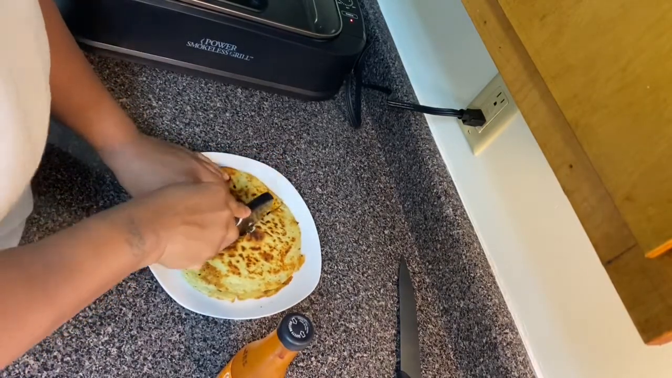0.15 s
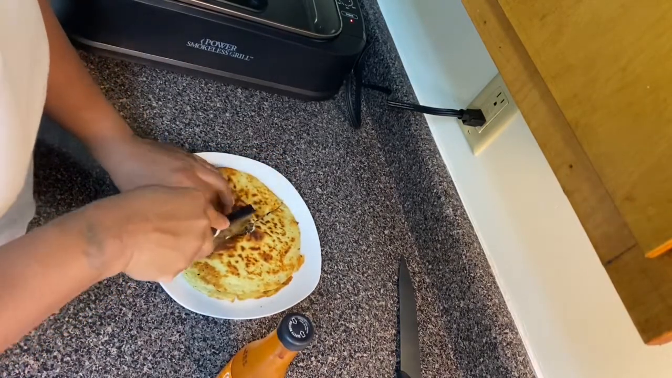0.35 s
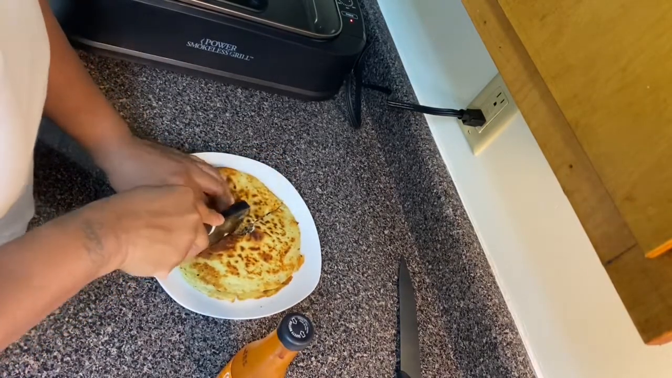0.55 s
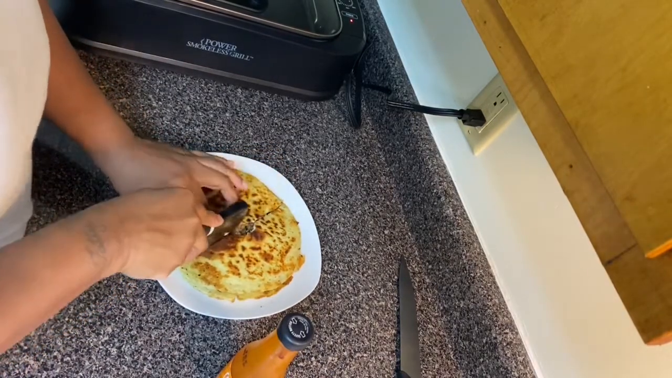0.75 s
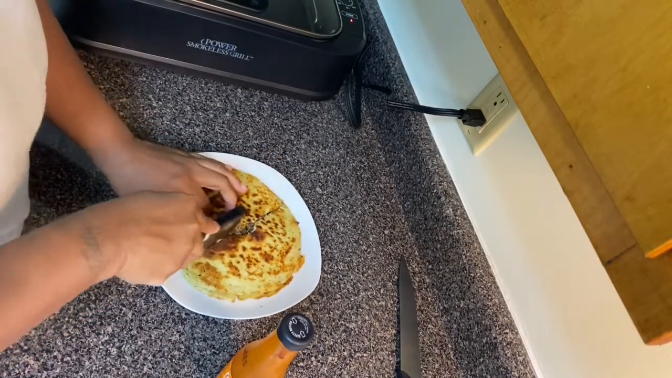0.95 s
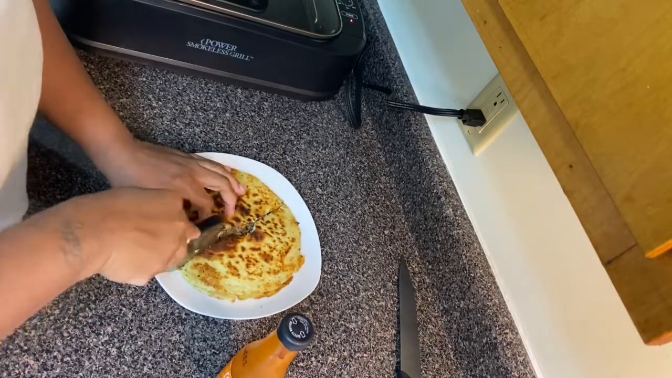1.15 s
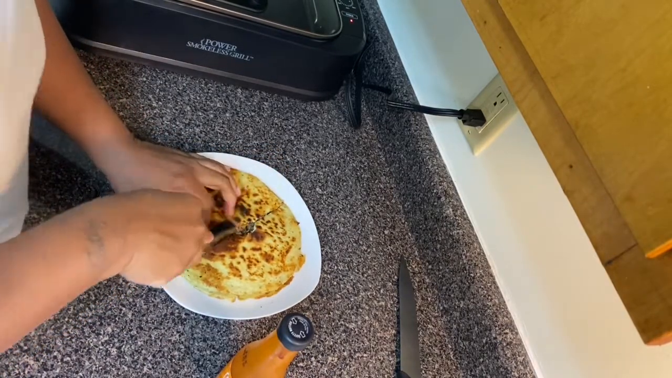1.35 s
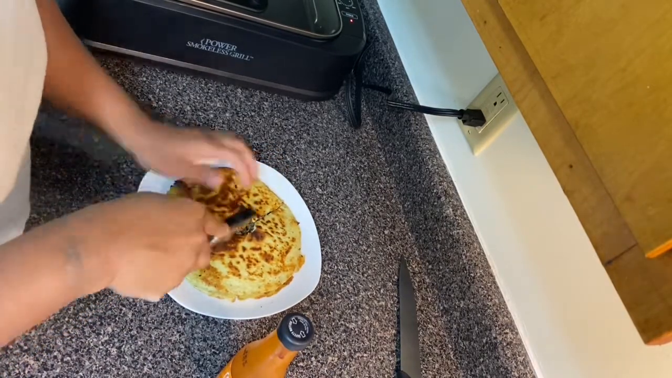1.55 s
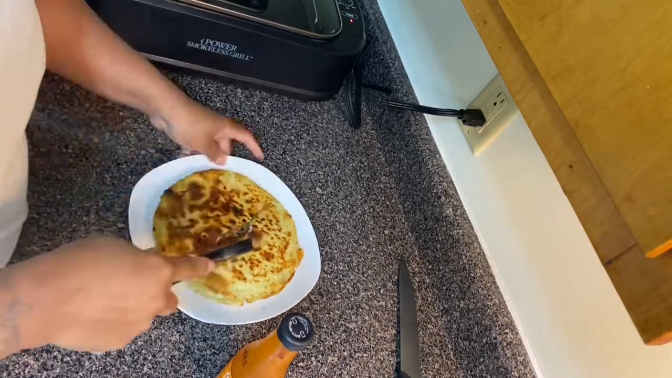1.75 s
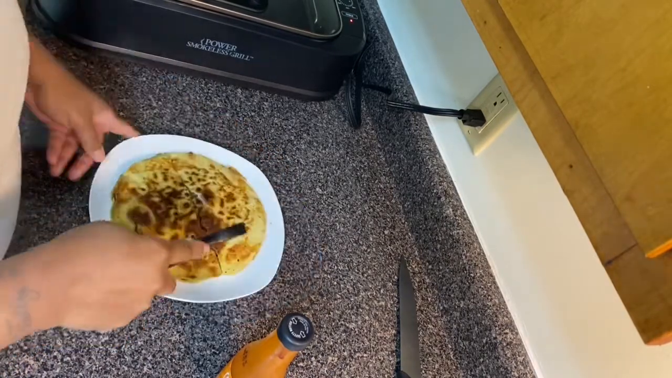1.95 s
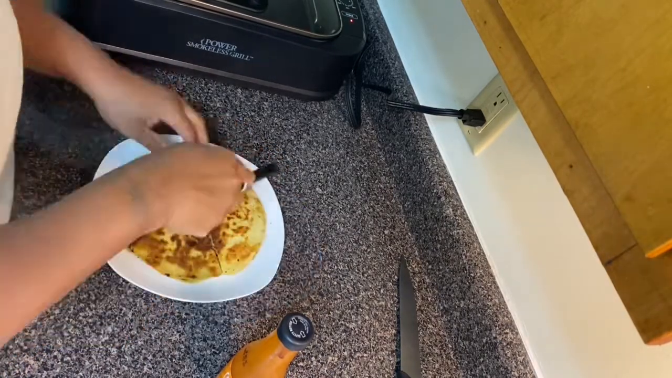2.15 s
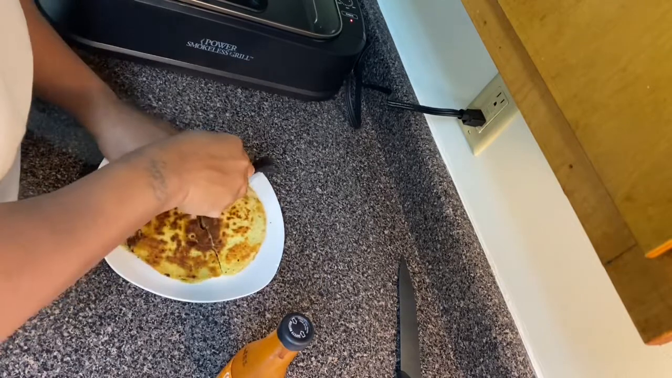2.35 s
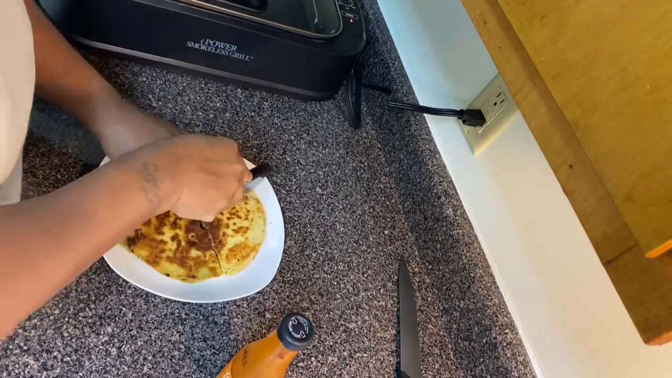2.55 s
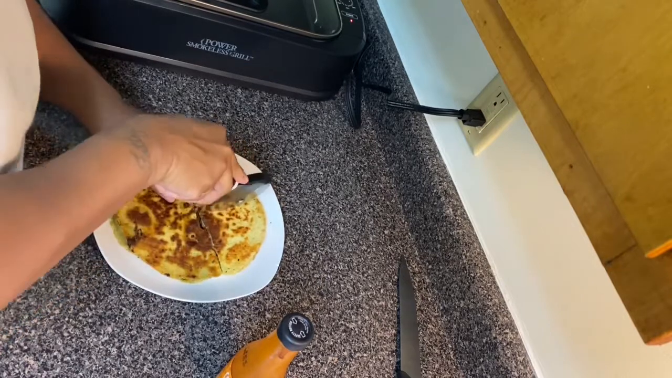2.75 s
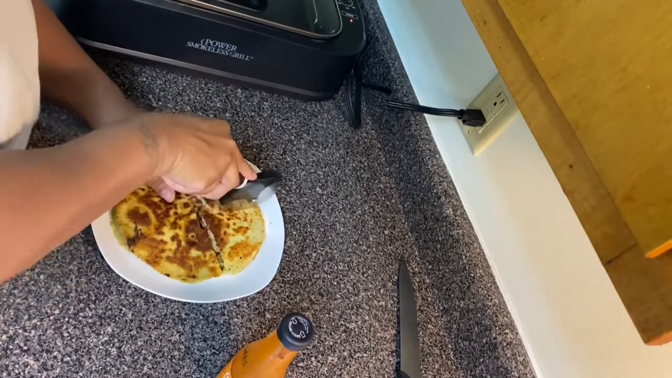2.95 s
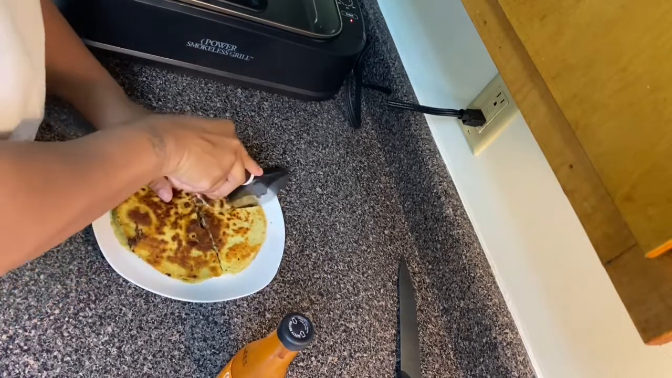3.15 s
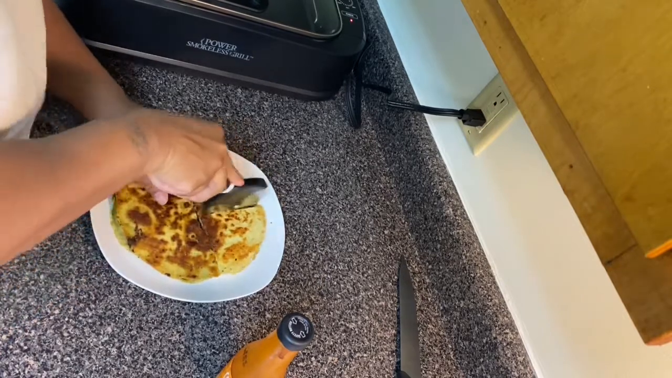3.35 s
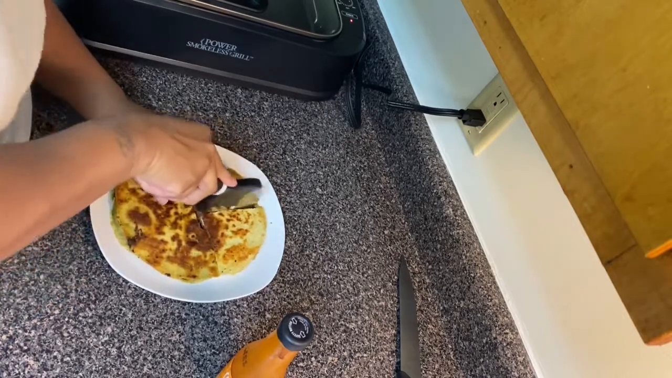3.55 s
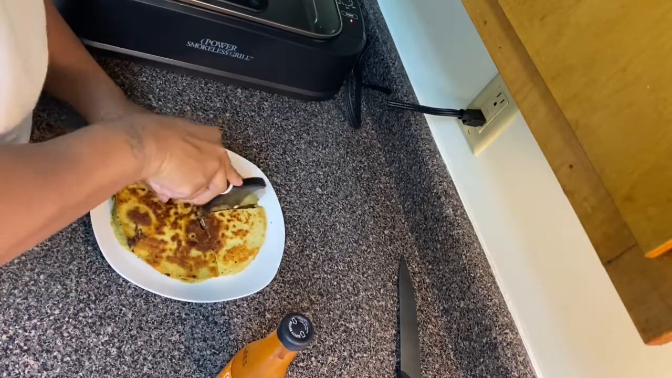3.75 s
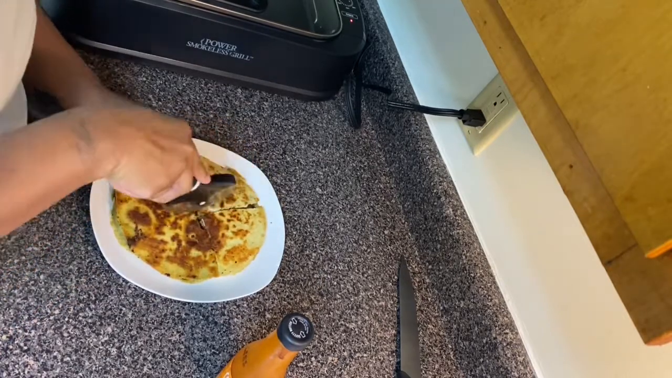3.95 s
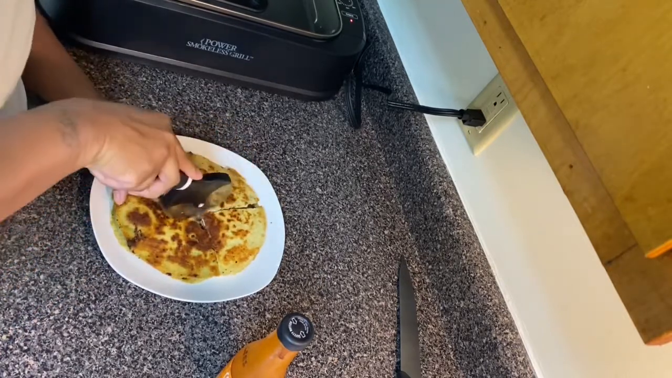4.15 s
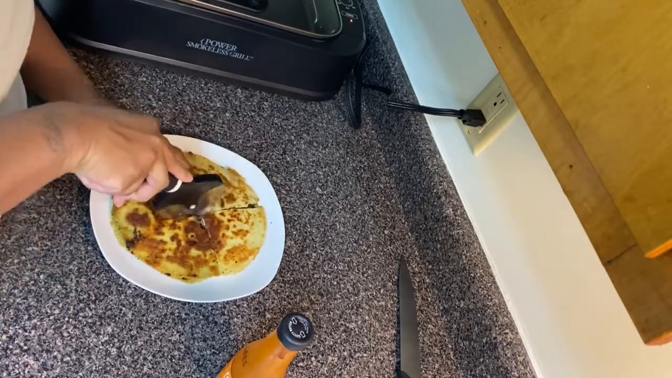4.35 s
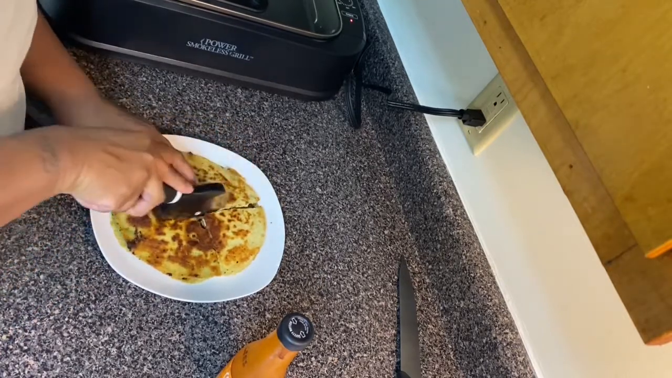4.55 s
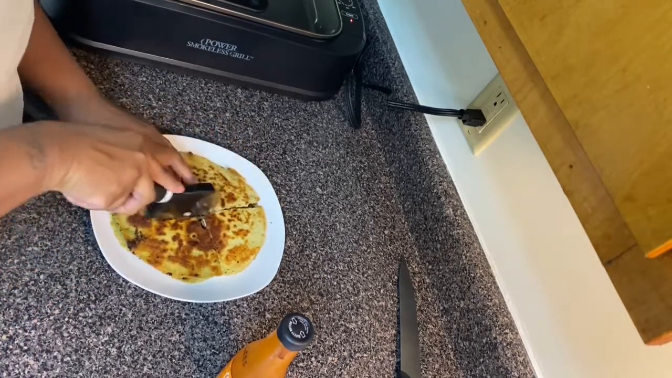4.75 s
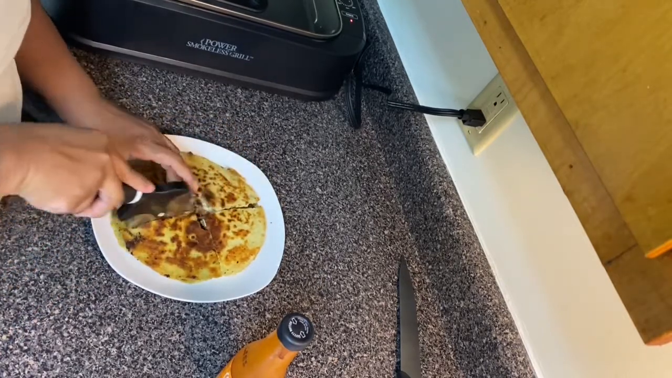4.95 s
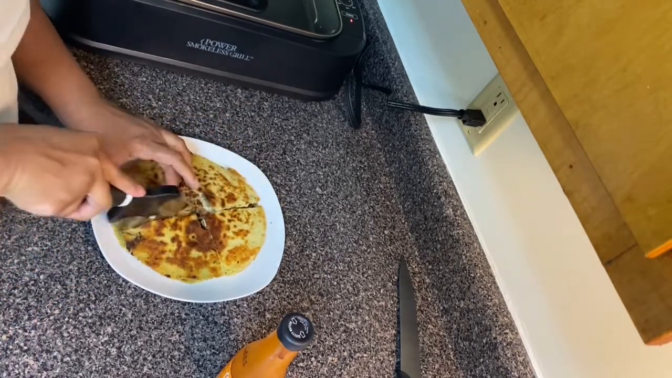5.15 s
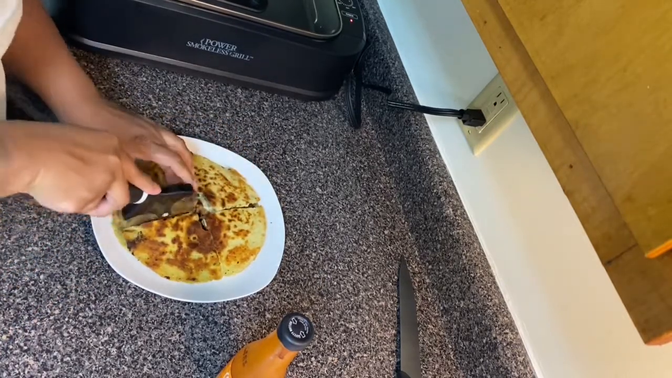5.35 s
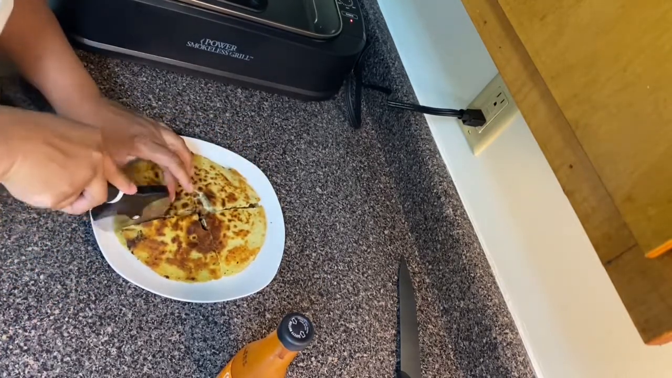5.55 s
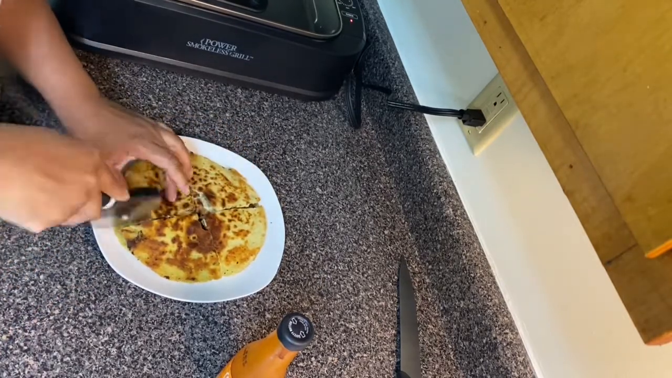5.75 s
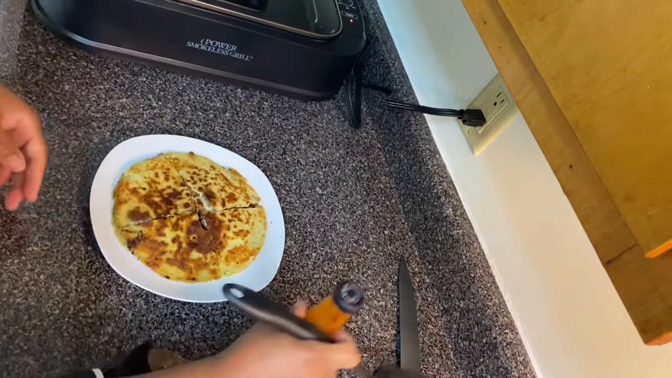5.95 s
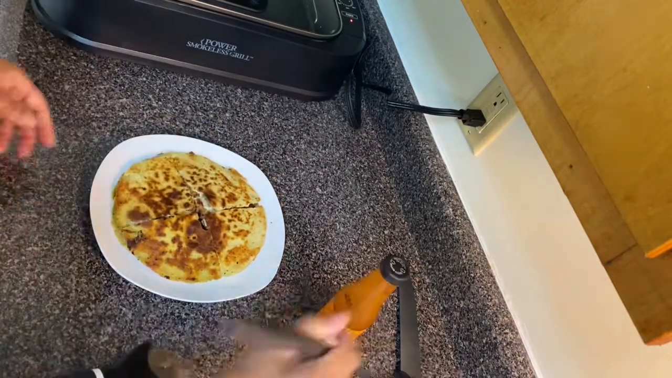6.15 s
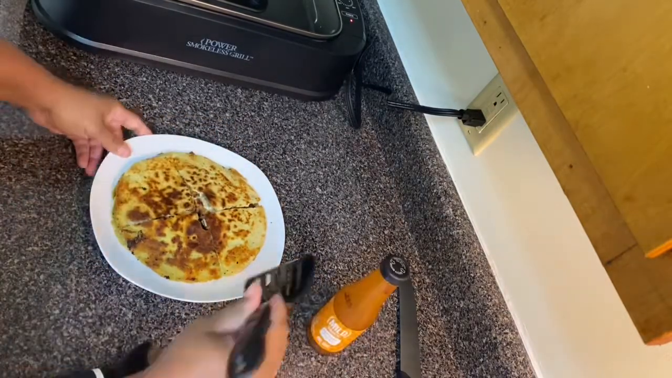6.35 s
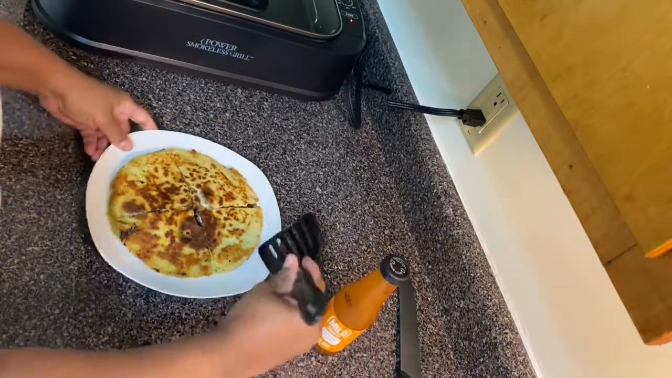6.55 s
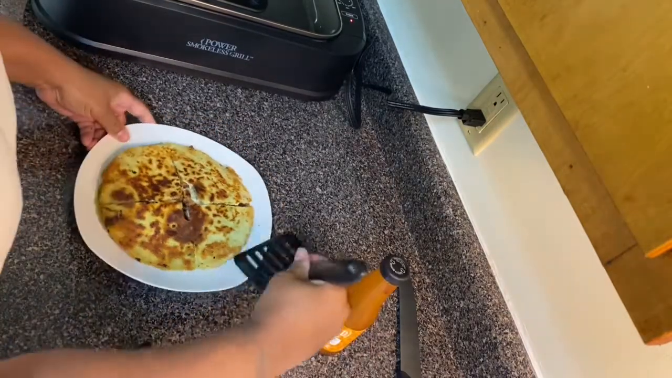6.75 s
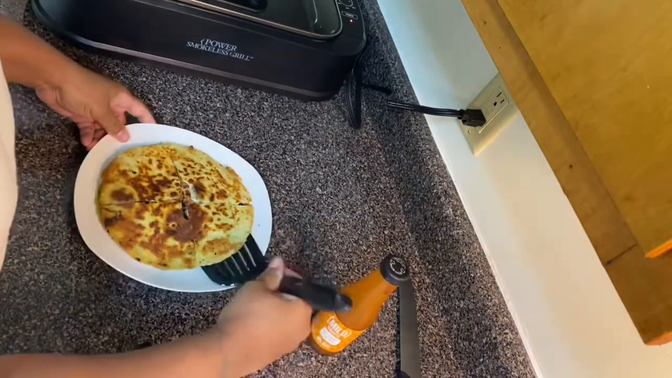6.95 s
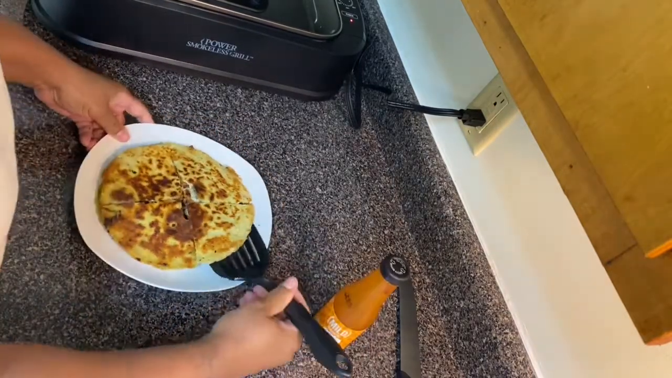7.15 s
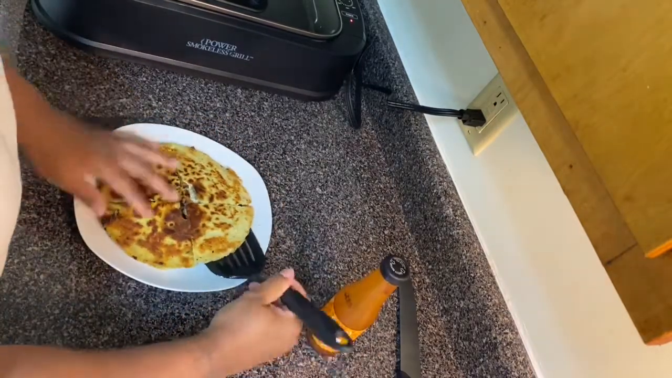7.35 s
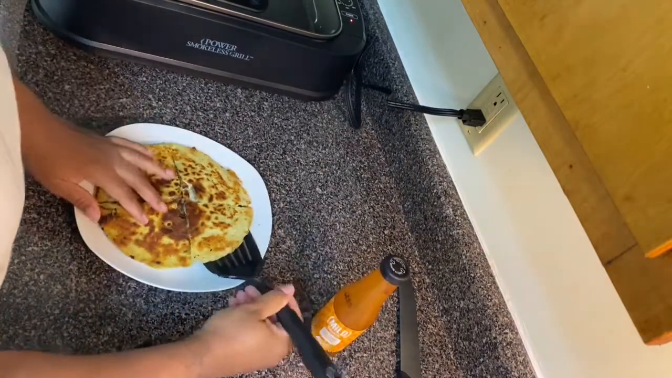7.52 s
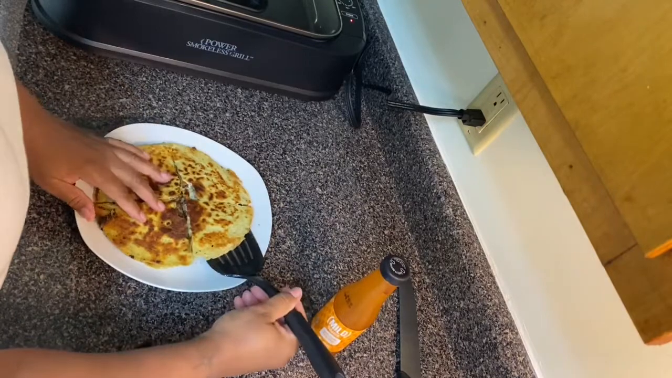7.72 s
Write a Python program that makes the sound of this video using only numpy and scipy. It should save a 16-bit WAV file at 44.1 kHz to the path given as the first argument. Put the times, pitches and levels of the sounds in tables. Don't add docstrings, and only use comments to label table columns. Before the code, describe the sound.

Close, brittle crunches and ticks as a cutting wheel works through a crisp wrap on a ceramic plate, with knocks, a plate scrape and humming kitchen.

```python
import sys
import numpy as np
from scipy import signal
from scipy.fft import rfft, irfft, next_fast_len
from scipy.io import wavfile
from scipy.ndimage import uniform_filter1d

SR = 44100
rng = np.random.default_rng(int(sys.argv[2]) if len(sys.argv) > 2 else 0)


def waveform_to_disk(signal):
    frames = np.transpose(np.atleast_2d(signal))
    scaled = np.clip(frames, -1, 1) * 32767
    samples = np.round(scaled).astype(np.int16)
    wavfile.write(sys.argv[1], SR, samples)


def gain_from_db(level_db):
    decades = np.asarray(level_db, float) / 20
    return 10 ** decades


N = 343142
CHANGE_S = 5.966

# f/Hz, likeness/0..1
PORT_LIKENESS = [(60, 0.98), (250, 0.9), (450, 0.78), (800, 0.16), (1500, 0.064), (3000, 0.38),
                 (6000, 0.59), (12000, 0.77)]
# f/Hz, left-right level/dB
PORT_LEAN = [(110, -1), (200, 1.5), (380, -1), (700, -1.5), (1290, 2.5), (2380, 1), (4400, 1.5), (10000, 5)]


def rms_one(x):
    return x / np.sqrt(np.mean(x ** 2) + 1e-20)


def in_time(spans):
    rows = []
    for span in spans:
        quiet = [-100] * (len(span[0]) - 1)
        rows += [(span[0][0] - .004, *quiet), *span, (span[-1][0] + .004, *quiet)]
    s, *columns = np.transpose(rows)
    return [gain_from_db(np.interp(np.arange(N) / SR, s, c)) for c in columns]


def at_hz(points, hz):
    f, value = np.array(points)[:, :2].T
    return np.interp(np.log(hz), np.log(f), value)


def band(x, low_hz, high_hz):
    edges = [low_hz, min(high_hz, .45 * SR)]
    return signal.sosfilt(signal.butter(2, edges, "band", fs=SR, output="sos"), x)


def pan(x, db):
    return np.outer(gain_from_db([db / 2, -db / 2]), x)


def add(out, s, sound):
    at = round(s * SR)
    out[..., at:at + sound.shape[-1]] += sound[..., :N - at]


def ring(clicks, hz, t60):
    r = gain_from_db(-60 / (max(t60, .002) * SR))
    w = 2 * np.pi * hz / SR
    return signal.lfilter([0, np.sin(w)], [1, -2 * r * np.cos(w), r * r], clicks + 1e-18)


def strike(events, modes, scatter_db):
    at = [round(s * SR) for s, db in events]
    luck = rng.standard_normal((len(events), len(modes)))
    out = 0
    for k, (hz, level_db, t60) in enumerate(modes):
        clicks = np.zeros(N)
        hit_db = np.array(events)[:, 1] + level_db + scatter_db * luck[:, k]
        clicks[at] = gain_from_db(hit_db) * np.sign(luck[:, k - 1])
        out = out + ring(np.roll(clicks, shift=9 * k), hz, t60)
    return out


def resonate(x, peaks):
    out = 0
    for k, (hz, width, level_db) in enumerate(peaks):
        r = np.exp(-np.pi * max(width, 1) / SR)
        poles = [1, -2 * r * np.cos(2 * np.pi * hz / SR), r * r]
        out = out + (-1) ** k * gain_from_db(level_db) * (1 - r * r) * signal.lfilter([1, 0, -1], poles, x)
    return rms_one(out)


def blotchy(x, peaks, patchy_db):
    steps = np.arange(0, N + 900, 900)
    luck_db = patchy_db * rng.standard_normal((len(peaks), len(steps)))
    out = 0
    for peak, luck in zip(peaks, luck_db):
        out = out + gain_from_db(peak[2] + np.interp(np.arange(N), steps, luck)) * resonate(x, [peak])
    return rms_one(out)


def grains(per_s, spread_db):
    sizes = gain_from_db(spread_db * np.minimum(rng.exponential(1, N), 4)) * rng.choice([-1, 1], N)
    return rms_one(sizes * (rng.random(N) < per_s / SR))


def crumble(t, length_s):
    fall = np.exp(-t / np.clip(length_s, .001, .03)) + 0.33 * np.exp(-t / 0.012)
    return np.minimum(t / 0.00012, 1) * fall


def sing(hz, width, size):
    wander = np.sqrt(2 * np.pi * max(width, 1) / SR) * rng.standard_normal(size)
    return np.sqrt(2) * np.sin(np.cumsum(2 * np.pi * hz / SR + wander))


def crust():
    # start t/s, length/s, level/dB
    snaps = [(0.722, .046, -61), (0.791, 0.056, -55), (.86, 0.048, -60), (1.102, 0.039, -56),
             (1.204, 0.067, -55), (1.283, 0.071, -54), (1.37, 0.069, -57.5), (1.435, .03, -59),
             (2.426, 0.039, -53), (2.664, 0.014, -55), (3.119, 0.11, -52), (3.694, 0.036, -56),
             (4.284, 0.047, -56), (4.374, 0.054, -58), (4.447, 0.11, -56.5), (4.537, 0.036, -57),
             (4.598, 0.18, -56), (5.611, 0.03, -55)]
    flakes = [(0.0, 0.043, -47.5), (.18, 0.1, -59), (.406, .04, -55.5), (.498, 0.041, -51),
              (.632, 0.069, -53.5), (2.54, 0.025, -64), (2.922, 0.11, -51.5), (3.052, 0.035, -53),
              (3.3, 0.15, -57.5), (4.173, 0.049, -61), (4.756, 0.14, -54.5), (4.92, 0.068, -53),
              (5.053, 0.051, -52.5), (5.166, 0.099, -54.5), (5.458, .03, -54), (6.668, .03, -54),
              (6.772, 0.039, -45.5), (6.843, 0.23, -60), (6.998, 0.06, -59), (7.11, 0.045, -57.5)]
    squashes = [(.06, 0.067, -59), (1.15, 0.035, -53.5), (3.108, 0.046, -51), (3.42, 0.032, -53),
                (3.482, 0.042, -53.5), (3.539, 0.029, -50.5), (3.6, 0.055, -54), (4.678, 0.091, -62),
                (5.107, 0.032, -54.5), (5.251, 0.027, -50.5), (5.372, 0.057, -56.5)]
    # crunch level/dB, top level/dB, dull level/dB
    manners = [
        (1, -3.5, -2.5),
        (-5, -3, -2.5),
        (-27, -14, 3.5),
    ]
    # f/Hz, width/Hz, level/dB
    crunch_peaks = [(4830, 990, 6), (6080, 96, 4), (6500, 340, 1), (7720, 200, 4)]
    top_peaks = [(9350, 1500, 2), (10200, 300, -9), (12200, 330, -7), (13600, 610, -3.5)]
    dull_peaks = [(1730, 850, 8.5), (2730, 1500, 9.5), (3300, 490, 1), (4100, 340, -19)]
    levels = np.zeros((3, N))
    for rows, parts_db in zip([snaps, flakes, squashes], manners):
        for s, length_s, db in rows:
            length = max(length_s, .01) * SR
            puff = np.sin(np.pi * (np.arange(int(length)) / length) ** 0.35)
            add(levels, max(s, 0), np.outer(gain_from_db(np.array(parts_db) + db - 1), puff))
    fractures = grains(per_s=2100, spread_db=2.0)
    crunch = blotchy(fractures, crunch_peaks, patchy_db=4.5) + .5 * rms_one(band(fractures, 4200, 9100))
    top = blotchy(fractures, top_peaks, patchy_db=1.5) + 0.86 * rms_one(band(fractures, 7600, 22000))
    dull = blotchy(grains(per_s=1500, spread_db=2.0), dull_peaks, patchy_db=4.5)
    return pan(sum(level * rms_one(part) for level, part in zip(levels, [crunch, top, dull])), 4.5)


def ticks():
    # t/s, peak level/dB, strongest ring f/Hz
    blade = [
        (0.418, -45, 6590),
        (0.479, -42, 3950),
        (2.3537, -44, 5200),
        (2.4314, -43, 5980),
        (3.1732, -39, 5650),
        (4.617, -48, 7010),
        (4.9307, -45, 6240),
        (5.2596, -38, 4700),
        (6.456, -45, 4540),
    ]
    shards = [
        (0.144, -46, 6500),
        (0.1836, -45, 9750),
        (0.5002, -43, 5900),
        (4.3799, -51, 6680),
        (4.6047, -47, 4970),
        (4.7656, -47, 6370),
        (5.516, -46, 4700),
        (5.611, -45, 5930),
        (6.669, -41, 10600),
        (6.79, -37.5, 6140),
    ]
    rim = [
        (1.159, -62, 3530),
        (1.684, -49.5, 3320),
        (5.1644, -60, 6140),
        (5.2077, -54, 3650),
        (6.096, -56, 3750),
    ]
    # crumble/s, body level/dB, top level/dB
    contacts = [
        (.0024, -2.5, -12),
        (.003, -3.5, 3),
        (.003, 12.5, -14),
    ]
    out, t = np.zeros(N), np.arange(4000) / SR
    for rows, (crumble_s, body_db, top_db) in zip([blade, shards, rim], contacts):
        for s, peak_db, hz in rows:
            burst = rng.standard_normal((3, len(t))) * crumble(t, crumble_s)
            snap = gain_from_db(-6.0) * band(burst[0], 4500, 10000) + gain_from_db(-36) * ring(burst[0], hz, 0.015)
            body = gain_from_db(body_db + 9.5) * band(burst[1], 380, 1340)
            top = gain_from_db(top_db - 7) * band(burst[2], 6900, 17000)
            add(out, s, gain_from_db(peak_db) * (snap + body + top))
    return pan(out, 7.5)


def pings():
    # t/s, f/Hz, level/dB
    knock_rings = [(3.1305, 8060, -42), (3.1312, 2126, -29), (3.1312, 9990, -45), (3.132, 875, -35.5),
                   (3.132, 4090, -34), (3.132, 5750, -29.5), (3.132, 6840, -32), (3.1487, 4390, -49),
                   (3.1494, 7000, -51), (3.133, 1490, -42), (3.1327, 3080, -38.5), (3.1712, 6030, -53),
                   (3.1762, 7150, -55), (3.1799, 5860, -55), (3.2807, 9800, -55), (3.2814, 2240, -47),
                   (3.2814, 5170, -52), (3.2814, 6120, -37.5), (3.2814, 11000, -47), (3.2822, 3740, -32.5),
                   (3.2822, 8500, -44), (3.2851, 924, -36), (3.2938, 6250, -46), (3.3112, 6200, -52),
                   (3.3126, 3750, -54),
                   (3.4193, 5050, -52), (3.42, 2130, -45), (3.42, 3720, -37), (3.42, 5840, -42),
                  (3.42, 7770, -44), (3.4215, 10680, -52), (3.4227, 945, -41.5), (3.4404, 4000, -51),
                  (3.4505, 5730, -56), (3.4861, 2860, -58), (3.4861, 3830, -48), (3.4876, 1870, -46),
                  (3.4875, 5080, -58), (3.4962, 1850, -46), (3.5434, 2020, -56), (3.5513, 4080, -44),
                  (3.607, 3580, -37), (3.6073, 2450, -41), (3.6073, 7670, -52), (3.607, 4740, -43),
                  (3.6087, 840, -40), (3.6094, 6400, -45), (3.6196, 4130, -50), (3.6115, 600, -39),
                  (3.69, 4130, -50), (3.6929, 4700, -49), (3.7001, 4130, -51)]
    # t/s, f/Hz, level/dB
    shard_chips = [(0.1446, 6720, -50), (0.1446, 7320, -53), (0.4174, 6550, -57), (0.4784, 3940, -49),
                   (0.4791, 7240, -58), (0.4791, 10940, -54), (0.5001, 5770, -48), (0.5001, 10850, -58),
                   (0.5009, 8870, -55), (0.5009, 14300, -54), (0.5016, 6860, -53), (0.5016, 8010, -57),
                   (0.5016, 12140, -58), (0.6344, 6980, -55), (0.6387, 4740, -54), (0.7323, 6980, -56),
                   (1.04, 5940, -53), (1.1118, 7750, -55), (1.114, 6120, -49), (1.159, 3560, -58),
                   (1.2134, 5940, -51), (1.2178, 7670, -55), (1.2236, 5900, -54), (1.2874, 6000, -55),
                   (1.3201, 5940, -57), (1.3861, 5940, -53), (2.3534, 6100, -51), (2.3563, 5160, -54),
                   (2.4267, 9220, -49), (2.433, 5860, -41), (2.4332, 7750, -53), (2.4434, 5800, -56),
                   (2.4463, 7580, -55), (2.9288, 6030, -53), (2.9419, 3740, -52), (2.9593, 6120, -48),
                   (2.9629, 13870, -58), (2.9658, 9900, -58), (2.9673, 3790, -48),
                   (4.3009, 6550, -55), (4.3786, 13090, -54), (4.38, 6630, -53), (4.4635, 6500, -50),
                  (4.4635, 8600, -53), (4.4765, 6550, -58), (4.5484, 6980, -58), (4.6043, 8610, -53),
                  (4.605, 5040, -52), (4.6064, 9650, -55), (4.6188, 6890, -49), (4.6188, 9400, -48),
                  (4.6384, 6460, -54), (4.7646, 12580, -53), (4.7646, 13950, -56), (4.7661, 7060, -58),
                  (4.7661, 8700, -57), (4.7682, 5340, -54), (4.769, 6290, -52), (4.7777, 4910, -55),
                  (4.7922, 4970, -51), (4.7929, 6290, -54), (4.9286, 8270, -57), (4.9293, 7320, -58),
                  (4.9293, 12230, -52), (4.9301, 13600, -55), (4.9308, 6120, -40), (4.9439, 6030, -57),
                  (4.9489, 12140, -54), (5.0658, 8270, -58), (5.0708, 6630, -60), (5.2058, 3680, -53),
                  (5.2535, 4650, -49), (5.2617, 4650, -44), (5.5156, 8100, -53), (5.6078, 8200, -51),
                  (5.61, 6080, -43.5), (6.4582, 4530, -52), (6.5845, 3760, -52), (6.6687, 7400, -60),
                  (6.6694, 11370, -58), (6.6701, 12920, -58), (6.6708, 10600, -54), (6.77, 6200, -49)]
    # t/s, f/Hz, level/dB
    bumps = [(5.979, 440, -35), (5.98, 664, -37), (6.801, 524, -45.5), (5.996, 340, -38.5),
             (5.998, 1450, -42), (6.0, 880, -40), (6.009, 443, -39), (6.012, 1004, -37.5),
             (6.01, 1450, -42), (6.022, 455, -36.5), (6.024, 997, -38.5), (6.038, 654, -38),
             (6.048, 390, -42), (6.072, 436, -42), (6.094, 590, -44), (6.108, 414, -46), (6.12, 430, -44),
             (5.977, 2860, -49), (5.991, 2910, -51), (6.051, 3650, -54), (6.066, 3620, -54),
             (6.117, 1450, -50)]
    # rise/s, fall/s, tail/s, tail level/dB
    shapes = [
        (.0005, .0022, .018, -19),
        (.0006, .0026, .014, -19),
        (.002, .008, .02, -16),
    ]
    out, t = np.zeros(N), np.arange(4000) / SR
    spots = [knock_rings, shard_chips, bumps]
    for rows, (rise_s, fall_s, tail_s, tail_db) in zip(spots, shapes):
        for s, hz, db in rows:
            rough = uniform_filter1d(rng.standard_normal(len(t)), size=150) * 12
            fall = np.exp(-t / fall_s) + gain_from_db(tail_db) * rough * np.exp(-t / tail_s)
            tone = np.sin(2 * np.pi * (hz * t + rng.random()))
            add(out, s, gain_from_db(db + 7.5) * (1 - np.exp(-t / rise_s)) * fall * tone)
    return pan(out, 2.8)


def knocks():
    # t/s, crack level/dB
    blows = [
        (3.1323, -23),
        (3.2824, -30),
        (3.4207, -33),
        (3.4865, -38),
        (3.4965, -46),
        (3.5507, -48),
        (3.6075, -33),
        (3.616, -39),
        (3.69, -55),
    ]
    out, t = np.zeros(N), np.arange(4000) / SR
    for s, crack_db in blows:
        burst = rng.standard_normal(len(t)) * crumble(t, 0.0011)
        thump = gain_from_db(crack_db - 28.5) * resonate(burst, [(439, 21, 0)])
        wide = band(band(burst, 800, 9600), 800, 9600)
        add(out, s, gain_from_db(crack_db - 2.5) * wide + thump)
    return pan(out, 3.4)


def crack():
    # f/Hz, level/dB
    modes = [(860, -18), (1392, -13), (2043, -6), (3321, -11), (4221, 0), (5674, -14), (6230, -10),
             (6865, -5), (8144, -8), (9006, -10), (9500, -12), (10097, -4), (12176, -11), (14104, -10)]
    # f/Hz, width/Hz, level/dB
    shiver_peaks = [(2140, 1700, 5.5), (3150, 500, -3), (4200, 470, -14), (5700, 1400, 9),
                    (6840, 630, 10.5), (8350, 540, 11), (10100, 200, 11), (12080, 160, 8), (14070, 130, 7)]
    crack_s, crack_db = 5.7122, 2
    rise_s, fall_s = .0009, .0012
    tail_s, tail_db = .026, -26.5
    body_s, body_db = 0.014, -37
    out, t = np.zeros((2, N)), np.arange(12000) / SR
    noise = rng.standard_normal((3, len(t)))
    blow = (1 - np.exp(-t / rise_s)) ** np.pi * np.exp(-t / fall_s)
    for (hz, db), turn in zip(modes, rng.random(len(modes))):
        tone = np.sin(2 * np.pi * (hz * t + turn))
        add(out, crack_s, pan(gain_from_db(crack_db + db) * blow * tone, at_hz(PORT_LEAN, hz) + 1.5))
    add(out, crack_s, pan(gain_from_db(crack_db - 8) * blow * band(noise[0], 1700, 16000), 4.0))
    wide = noise[1] + 0.46 * noise[2] * [[1], [-1]]
    shiver = resonate(wide, shiver_peaks) + 0.19 * band(noise[1:], 1000, 9600)
    tail = gain_from_db(tail_db) * np.minimum(t / 0.0014, 1) * np.exp(-t / tail_s)
    add(out, crack_s, shiver * tail * gain_from_db([[1.5], [-1.5]]))
    body = rms_one(band(noise[2], 400, 780)) * np.minimum(t / 0.0075, 1) * np.exp(-t / body_s)
    add(out, crack_s, pan(gain_from_db(body_db) * body, 0))
    return out


def wheel():
    # t/s, level/dB
    flicks = [
        (0.1835, -41),
        (2.354, -58),
    ]
    # f/Hz, level/dB, t60/s
    steel = [(5120, -16, .2), (6580, -19, .15), (7720, -6, .27), (10650, -13, .26), (12130, -17, .2),
             (13860, -6, .11), (14300, -12, .1)]
    return pan(strike(flicks, steel, scatter_db=1.0), 3.9)


def skid():
    # t/s, level/dB
    slips = [
        (3.1155, -39),
        (3.1205, -40),
        (3.125, -37),
    ]
    # f/Hz, level/dB, t60/s
    modes = [(517, 4, 0.016), (733, 2.5, 0.018), (1680, -2, 0.031), (6120, -9, 0.055)]
    return pan(strike(slips, modes, scatter_db=1.0), 3.9)


def slide():
    # t/s, scrape level/dB, rumble level/dB
    pushes = [
        (1.684, -66, -58),
        (1.69, -50, -37.5),
        (1.712, -66, -48),
        (1.768, -50.5, -50),
        (1.818, -41, -42.5),
        (1.838, -46, -51),
        (1.866, -42.5, -50),
        (1.912, -48, -44.5),
        (1.945, -62, -66),
    ]
    # f/Hz, level/dB, level gained in the second push/dB
    plate_modes = [(902, -2, 4), (1080, -4, 4), (1610, -5, -4), (2060, 2.5, 1.5), (2810, -3, -3),
                   (3520, 0, 2), (4400, -5, 5), (4940, -5, 2), (7590, -12, 0), (8270, -11, 0),
                   (8600, -13, 2), (12050, -13, 2)]
    # f/Hz, level per Hz/dB
    colour = [(1200, -3), (2000, -1), (3500, -0.5), (4800, 0), (5600, -11), (9000, -12), (13000, -10),
              (16000, -30)]
    # t/s, f/Hz, level/dB
    rim_mode = [
        (1.72, 5850, -68),
        (1.78, 5900, -60),
        (1.82, 6020, -55),
        (1.9, 6080, -58),
        (1.97, 6100, -71),
    ]
    size, second_push_s = 2 * SR, 1.845
    scrape, rumble = (level[:size] for level in in_time([pushes]))
    t, out = np.arange(size) / SR, np.zeros((2, N))
    steps = np.arange(0, size + 400, 400)

    def judder(db):
        return np.interp(np.arange(size), steps, db * rng.standard_normal(len(steps)))

    grit = grains(per_s=6000, spread_db=2.0)[:size]
    edges = np.geomspace(1200, 16000, 12)
    broad = 0
    for k, (low, high) in enumerate(zip(edges, edges[1:])):
        level = gain_from_db(at_hz(colour, np.sqrt(low * high)) + judder(db=3.0))
        broad = broad + level * (-1) ** k * band(grit, low, high)
    push = np.tanh((t - second_push_s) / .01)
    modes = 0
    for hz, db, gain_db in plate_modes:
        modes = modes + gain_from_db(db + gain_db * push + judder(db=4.0)) * sing(hz, 85, size)
    s, hz, db = np.transpose(rim_mode)
    squeak = gain_from_db(np.interp(t, s, db, -100, -100) + judder(db=4.0)) * sing(np.interp(t, s, hz), 70, size)
    hiss = gain_from_db(-3.0) * rms_one(broad) + gain_from_db(-10) * modes
    low_grind = rms_one(band(grains(per_s=7100, spread_db=2.5)[:size], 170, 950))
    add(out, 0, pan(scrape * hiss + squeak, 3.2))
    add(out, 0, pan(gain_from_db(-1.5) * rumble * low_grind, 1.3))
    return out


def thuds():
    # t/s, peak level/dB, f/Hz
    rocks = [(0.009, -37, 137), (0.05, -38, 124), (0.509, -35, 146), (1.068, -39, 117), (1.158, -37.5, 160),
             (1.211, -36.5, 121), (1.633, -32.5, 141), (1.6866, -29, 142), (1.739, -36, 133),
             (2.943, -35.5, 161), (3.135, -30.5, 138), (3.291, -39, 128), (3.454, -40, 131),
             (4.581, -38.5, 142), (4.759, -38, 178), (4.859, -40, 134), (5.11, -45, 136), (5.185, -35, 149),
             (5.393, -37, 190), (5.53, -33, 132), (5.711, -35, 160)]
    out, t = np.zeros(N), np.arange(4000) / SR
    swell = (1 - np.exp(-t / 0.019)) * np.exp(-t / 0.0053)
    for s, peak_db, hz in rocks:
        w = 2 * np.pi * hz
        boom = np.sin(w * t) - 0.21 * np.cos(2 * w * t) + 0.12 * np.sin(3 * w * t)
        add(out, s, gain_from_db(peak_db + 19.5) * boom * swell)
    return pan(out, 0)


def pickup():
    # t/s, hollow level/dB, scratch level/dB
    dragged = [
        (5.972, -49, -70),
        (5.982, -35.5, -59),
        (5.998, -34, -45.5),
        (6.026, -41, -49),
        (6.07, -42, -56),
        (6.09, -50, -62),
        (6.096, -48, -59),
        (6.124, -52, -64),
        (6.14, -58, -74),
    ]
    # t/s, level/dB
    brushing = [
        (6.52, -66),
        (6.545, -51),
        (6.61, -52.5),
        (6.65, -57),
    ]
    # f/Hz, width/Hz, level/dB
    hollow_peaks = [(328, 29, -4), (392, 23, 3.5), (547, 86, -13), (650, 22, 3.5), (840, 45, -15),
                    (950, 53, -1), (1060, 37, -7), (1450, 58, -4)]
    scratch_peaks = [(1770, 500, 7.5), (2930, 88, 9.5), (3570, 190, 5), (4500, 250, -4)]
    brush_peaks = [(1610, 84, 5), (2000, 240, 4), (2930, 130, -12), (3400, 64, 6), (4280, 49, -3),
                   (4730, 43, 1), (6140, 56, -5), (7680, 89, -13)]
    hollow, scratch = in_time([dragged])
    brush, = in_time([brushing])
    rattle = grains(per_s=6000, spread_db=2.0)
    dull = resonate(rattle, hollow_peaks) + 1.05 * rms_one(band(rattle, 290, 1540))
    sharp = resonate(rattle, scratch_peaks) + 0.41 * rms_one(band(rattle, 1600, 4600))
    brushed = resonate(rattle, brush_peaks) + 0.79 * rms_one(band(rattle, 1700, 5100))
    drag = gain_from_db(-5.0) * hollow * rms_one(dull) + gain_from_db(2.5) * scratch * rms_one(sharp)
    return pan(drag + gain_from_db(-1.0) * brush * rms_one(brushed), 2.3)


def spatula():
    # t/s, level/dB
    taps = [
        (6.773, -50),
        (6.778, -51),
        (6.783, -39),
        (6.788, -48),
        (6.7915, -32),
        (6.794, -43),
        (6.806, -46),
    ]
    # f/Hz, level/dB, t60/s
    edge_modes = [(4545, -4, .025), (6140, -6, .015), (7630, -4, .03), (9530, -4, .03), (11500, -9, .02),
                  (13900, -12, .02), (3270, -18, .03)]
    return pan(strike(taps, edge_modes, scatter_db=1.0), 3.9)


def kitchen(x):
    t60_s, wall_cut_hz = 0.22, 11000
    size = next_fast_len(N + SR)
    w = 2 * np.pi * np.arange(size // 2 + 1) / size
    dull = 1 / (1 + 1j * w * SR / (2 * np.pi * wall_cut_hz)) ** 0.19
    paths = np.zeros((2, len(w)), complex)
    lags = (rng.uniform(0.011, 0.034, 20) * SR).astype(int)
    for k, lag in enumerate(lags):
        once = gain_from_db(-60 * lag / SR / t60_s) * dull * np.exp(-1j * w * lag)
        paths[k % 2] += (-1) ** (k // 2) * once / (1 - once)
    return irfft(rfft(x, size) * paths, size)[:, :N]


def hum():
    # f/Hz, width/Hz, level before the change/dB, level after/dB
    roars = [(124, 25, -64, -59.5), (233.9, 12, -64.5, -66), (414.3, 53, -61.5, -59)]
    # f/Hz, level before the change/dB, level after/dB
    tones = [(117.8, -55, -87.5), (1595, -65.5, -66), (3190, -63.5, -72)]
    t = np.arange(N) / SR
    out, after = 0, t > CHANGE_S
    for hz, width, before_db, after_db in roars:
        peak = [(hz, width, 0)]
        mid, side = (resonate(resonate(v, peak), peak) for v in rng.standard_normal((2, N)))
        wide = np.sqrt(1 - np.clip(at_hz(PORT_LIKENESS, hz), 0, 1))
        out = out + gain_from_db(np.where(after, after_db, before_db)) * (mid + .5 * wide * side * [[1], [-1]])
    slow = uniform_filter1d(rng.standard_normal((2, N)), size=5000)
    wander = rms_one(uniform_filter1d(slow, size=5000))
    for hz, before_db, after_db in tones:
        phase = 2 * np.pi * hz * (t + 0.000367 * np.cumsum(wander[0]) / SR)
        level = gain_from_db(np.where(after, after_db, before_db) + 2.5 + 0.5 * wander[1])
        out = out + pan(level * np.sin(phase), at_hz(PORT_LEAN, hz))
    return out


def air():
    # f/Hz, level per Hz/dB
    colour_before = [(29, -54), (50, -24.5), (118, -5.5), (258, -17), (416, -9), (1400, -17.5), (2100, -23),
                     (14800, -37.5)]
    colour_after = [(29, -68), (50, -21), (164, -5.5), (258, -12.5), (397, -5), (1050, -10), (2730, -20.5),
                    (14800, -33)]
    before_db, after_db = -45.5, -50
    out, edges = 0, 28 * 2 ** (np.arange(29) / 3)
    white = rng.standard_normal((2, 2, N))
    after = np.arange(N) / SR > CHANGE_S
    for k, (low, high) in enumerate(zip(edges, edges[1:])):
        mid, side = band(white[k % 2], low, high)
        hz = np.sqrt(low * high)
        alike = np.clip(at_hz(PORT_LIKENESS, hz), 0, 1)
        lean_db = at_hz(PORT_LEAN, hz)
        level_db = np.where(after, at_hz(colour_after, hz) + after_db, at_hz(colour_before, hz) + before_db)
        both = np.sqrt(1 + alike) * mid + np.sqrt(1 - alike) * side * [[1], [-1]]
        out = out + gain_from_db(level_db + 18.5) * both * gain_from_db([[lean_db / 2], [-lean_db / 2]])
    return out


def scene():
    cutting = crust() + ticks() + pings() + knocks() + crack() + wheel() + skid()
    near = cutting + slide() + pickup() + spatula()
    room = gain_from_db(-18.5) * kitchen(near.mean(axis=0))
    return near + room + thuds() + hum() + air()


def low_pass(x):
    return signal.sosfilt(signal.butter(12, 16730, fs=SR, output="sos"), x)


def record(dry):
    # f/Hz, lead/rad
    left_lead = [(520, -0.26), (1120, 0.75), (1640, -0.76), (2240, 1), (4130, 0.7), (6630, 1), (7840, 0.9),
                 (9990, -0.68)]
    low_hz, top_hz = 60, 16000
    narrow_hz, narrow_db = 12400, -7
    size = next_fast_len(N)
    lead = at_hz(left_lead, np.arange(1, size // 2 + 2) * SR / size)
    left, right = rfft(dry, size) * np.exp(.5j * lead * [[1], [-1]])
    hz = np.arange(len(left)) * SR / size
    side = (left - right) / 2 * gain_from_db(narrow_db * (hz > narrow_hz))
    ports = irfft((left + right) / 2 + side * [[1], [-1]], size)[:, :N]
    ports = signal.sosfilt(signal.butter(3, low_hz, "high", fs=SR, output="sos"), ports)
    ports = signal.sosfilt(signal.cheby2(14, 50, top_hz + 400, fs=SR, output="sos"), ports)
    fade_db = np.interp(np.arange(N) / SR, [CHANGE_S - .024, CHANGE_S, CHANGE_S + .012], [0, -16, 0])
    return low_pass(ports * gain_from_db(fade_db))


dry = scene()
out = record(dry)
waveform_to_disk(out)
```